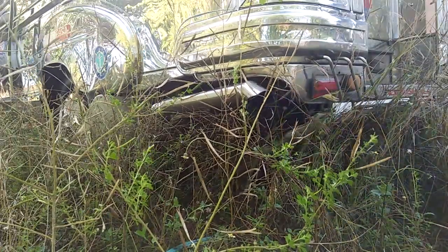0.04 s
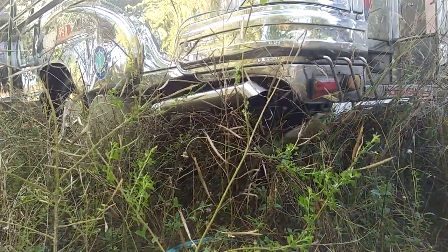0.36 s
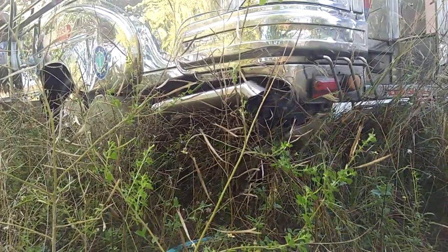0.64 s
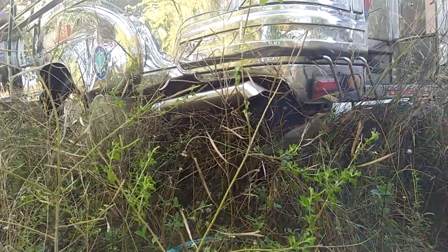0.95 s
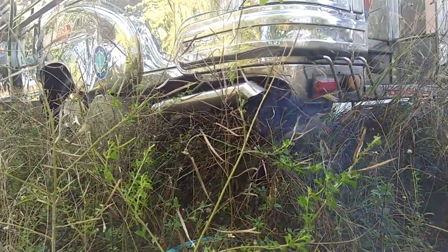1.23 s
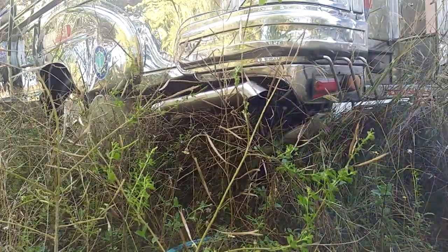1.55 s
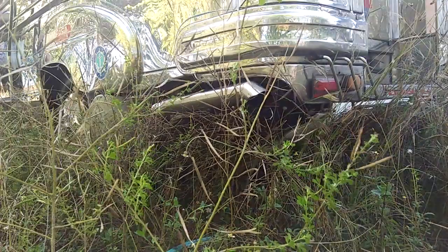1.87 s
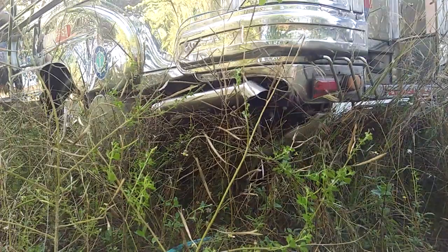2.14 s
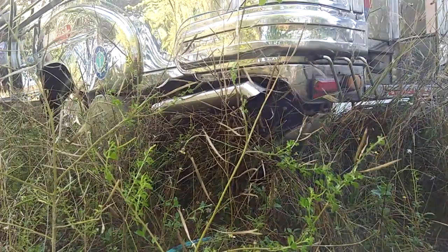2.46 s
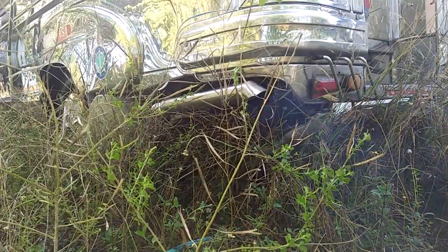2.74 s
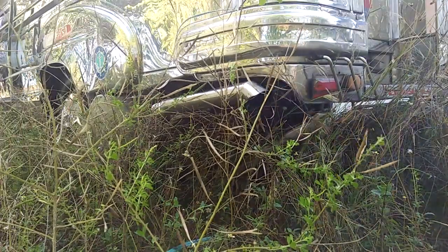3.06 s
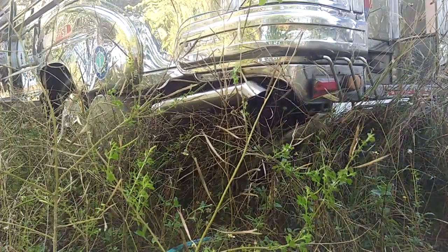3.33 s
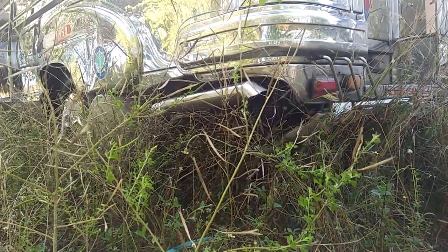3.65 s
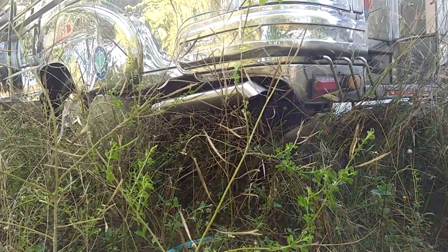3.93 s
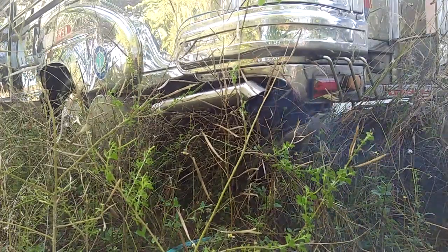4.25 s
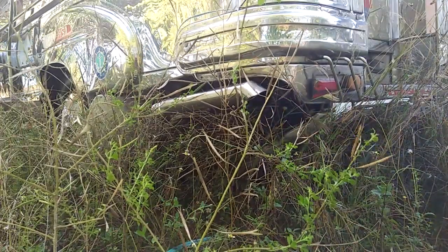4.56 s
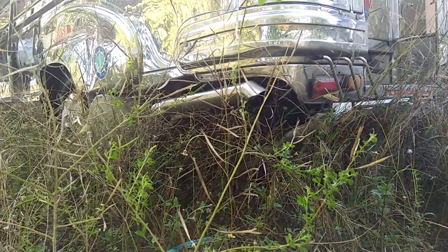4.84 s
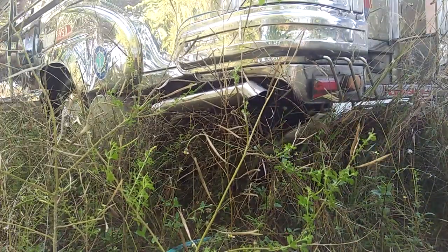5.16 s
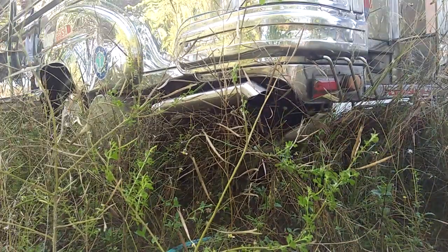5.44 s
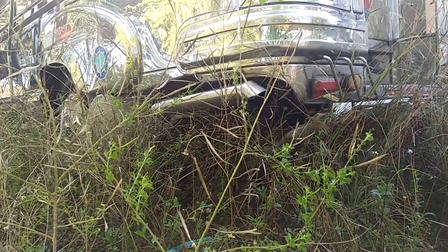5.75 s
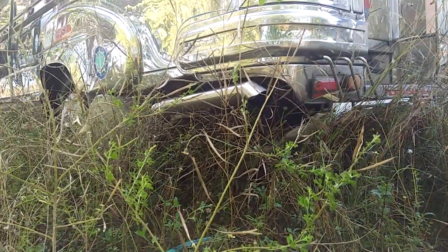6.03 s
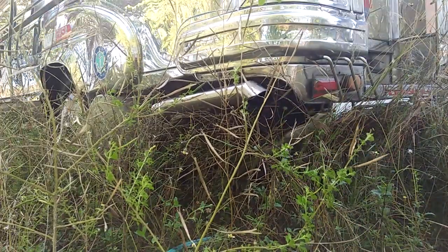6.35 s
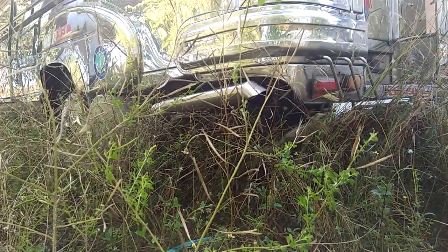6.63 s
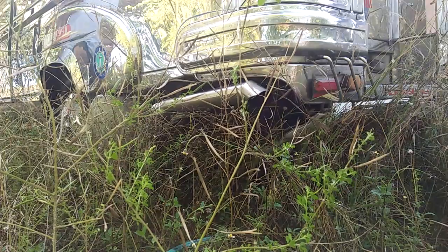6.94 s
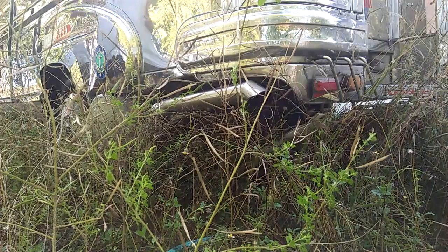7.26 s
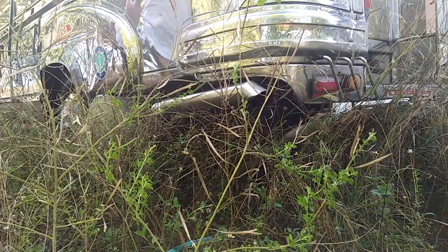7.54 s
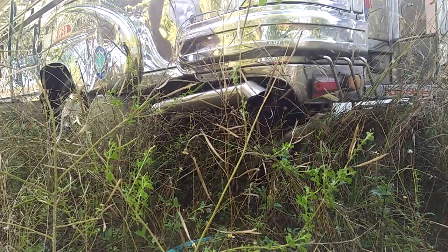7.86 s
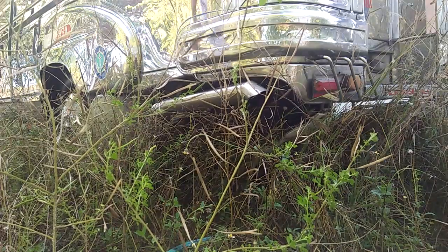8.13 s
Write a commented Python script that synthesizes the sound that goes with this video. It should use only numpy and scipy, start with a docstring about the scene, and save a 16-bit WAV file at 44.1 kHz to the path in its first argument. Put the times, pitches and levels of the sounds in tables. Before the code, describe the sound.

Three sharp engine revs blow water out of a chattering tailpipe before settling into a low, wet idle outdoors.

```python
"""A vehicle parked in tall weeds, heard from near its wet exhaust pipe. The engine is already slowing
when the throttle is blipped three times. Each blip barks firing by firing, tears water loose in a
spitting rasp, then coasts down with a silencer drone, a tinny tailpipe chatter and fine spray. After
the third, water plops in the pipe and the engine sinks to a gurgling idle while the weeds patter and
rustle and footsteps thud softly past, over the dull, low background noise of the yard."""
import sys
import numpy as np
from scipy import signal
from scipy.fft import rfft, irfft, next_fast_len
from scipy.io import wavfile
from scipy.ndimage import uniform_filter1d, minimum_filter1d

SR = 44100
rng = np.random.default_rng(int(sys.argv[2]) if len(sys.argv) > 2 else 0)


def unload_wav(signal):
    """Save mono or channel-first audio to the path in sys.argv[1] as 16-bit WAV at rate SR, clipped to [-1, 1]."""
    wavfile.write(
        sys.argv[1],
        SR,
        np.round(np.clip(np.atleast_2d(signal).T, -1, 1) * 32767).astype(np.int16),
    )


N = 365588
TIME = np.arange(N) / SR


# throttle blips: (open [s], hardest firing [s], shut [s], top firing rate [Hz], drone [dB], boom [dB])
BLIPS = [(.614, .743, 1.055, 73.2, 2.5, 9), (2.16, 2.26, 2.572, 75.3, -.5, 4),
         (3.678, 3.772, 4.08, 75.2, 0, 0)]
OPEN_S, BITE_S, SHUT_S, TOP_HZ, DRONE_DB, BOOM_DB = range(6)
# exhaust pipe resonances: (frequency [Hz], width [Hz], gain [dB])
PIPE_MODES = [(481, 91, 0), (580.6, 48.4, 2.5), (743, 210, 2), (885, 97, 5), (1239, 320, 3),
              (1500, 290, 0.5), (1632, 74, -5), (2175, 380, -7.5), (4334, 530, -19)]
# broadband part of the bark: (frequency [Hz], gain [dB])
BARK_SPECTRUM = [(30, -31), (70, -1.5), (150, 1), (260, -1.5), (380, -6), (1000, -7), (1900, -29),
                 (2700, -21), (3500, -26.5), (8000, -55)]
# firing hiss under load: (frequency [Hz], gain [dB])
HISS_SPECTRUM = [(1200, -19), (2300, 7.5), (3500, -3.5), (4500, 2.5), (6200, 6.5), (7800, 9.5), (9500, 0.5),
                 (14000, -20.5)]

def bark(firings, db=-12, hiss_db=-30, bite_db=-2, octave_db=-3, slap=7.8):
    """Under load each firing sends a pressure slap and a hissing gust through the pipe."""
    bite = 1 + bursts([(blip[BITE_S], bite_db) for blip in BLIPS], decay_s=.034)
    flow = bite * puffs(firings, decay_s=.0045, leak=.13, uneven_db=3, rise_s=.001)
    slaps = slap * firing_hz() / OPEN_HZ * impulses(firings)
    pipe_gain = np.hypot(peaks(PIPE_MODES), spectrum(BARK_SPECTRUM))
    pipe = levelled(colour(flow * noise() + slaps, pipe_gain), samples=2000)
    gusts = levelled(puffs(firings, decay_s=.0072, leak=.011, uneven_db=7.5), samples=2000)
    hiss = amp(hiss_db) * bite * gusts * spread(lambda: shaped_noise(HISS_SPECTRUM))
    push = load()
    return amp(with_speed(octave_db, 0)) * (push ** 1.53 * amp(db) * pipe + push ** .82 * hiss)


# water tearing loose: (start [s], end [s], level [dB])
TEARS = [(0.825, 0.936, -9.5), (2.318, 2.438, -9.5), (3.799, 3.947, -10)]
# spitting water: (frequency [Hz], gain [dB])
RASP_SPECTRUM = [(300, -46), (1200, 1.5), (2200, 2), (3200, -5), (4400, -6), (5200, -7), (6800, -3),
                 (7700, 2.5), (8800, -7), (10500, -11), (14000, -14.5)]

def rasp(firings, db=-3.5, grit_db=1.5):
    """At full flow the gas tears water into a sudden, harsh, pulsing spit."""
    gate = sum(amp(level_db) * np.interp(TIME, [start - .002, start, end, end + .025], [0, 1, 1, 0])
               for start, end, level_db in TEARS)
    flow = puffs(firings, decay_s=.007, leak=.2, uneven_db=2) * amp(grit_db * drift(500))
    spit = amp(db) * gate * levelled(flow, samples=2000)
    return spread(lambda: spit * shaped_noise(RASP_SPECTRUM))


# silencer response: (frequency [Hz], gain [dB])
SILENCER_RESPONSE = [(25, -24), (38, -14.5), (57, -4), (75, 4.5), (90, 3.5), (105, -19.5), (119, -1.5),
                     (130, -4.5), (146, 6), (164, -11.5), (182, -4.5), (197, 1.5), (214, -7.5), (250, -9.5),
                     (285, -15), (340, -15)]
# uneven idle: (time [s], bass level [dB], mid level [dB])
IDLE_LEVELS = [(5.47, -47, -42.5), (5.73, -43, -44.5), (6.32, -45.5, -47), (6.35, -48, -53),
               (6.53, -44.5, -47.5), (6.63, -57.5, -68), (6.85, -48, -55), (6.91, -47, -37.5),
               (6.97, -57, -52.5), (7.63, -45.5, -47.5), (7.7, -48, -53), (7.82, -45.5, -43),
               (7.93, -50, -54), (8.04, -41, -46), (8.18, -50.5, -50.5), (8.29, -43, -45.5)]

def drone(firings, db=-32, octave_db=4, load_db=9.5, mellow_db=-4, idle_db=-5, lope_db=-56):
    """Engine orders slide through the silencer's resonances; uneven cylinders add a half order."""
    rate_hz, push = firing_hz(), load()
    silencer_hz, silencer_db = np.transpose(SILENCER_RESPONSE)
    boom_db = latest_blip(BOOM_DB) * push * np.exp(-(TIME - latest_blip(OPEN_S)) / .14)
    blip_db = uniform_filter1d(latest_blip(DRONE_DB), size=400)
    level_db = db + blip_db + (1 - push) * with_speed(octave_db, 0) + load_db * push
    upper_db = with_speed(0, mellow_db)
    shaky = firings + .012 * drift(22)  # uneven firing roughens the upper orders
    orders = 0
    for k in range(1, 7):
        pass_db = np.interp(k * rate_hz, silencer_hz, silencer_db, right=-40)
        pass_db *= 1 - .48 * push  # flatter under load
        order_db = pass_db + boom_db * 2 / k + upper_db * max(k - 2, 0)
        orders += amp(order_db + drift(8)) * np.sin(2 * np.pi * k * shaky)
    gain = running() * amp(level_db) + amp(idle_db) * idling(IDLE_LEVELS)
    return gain * orders + amp(lope_db) * np.sin(3 * np.pi * firings)


# low rumble: (frequency [Hz], gain [dB])
RUMBLE_SPECTRUM = [(20, -28), (40, -8.5), (80, 4.5), (145, 3.5), (210, -9), (300, -5.5), (380, -24.5),
                   (600, -57.5), (1500, -95.5)]
# soft low thuds of footsteps passing the vehicle: (time [s], level [dB])
FOOTSTEPS = [(6.889, -45), (7.169, -48), (7.969, -56), (8.049, -37)]

def burble_and_footsteps(firings, db=-42, octave_db=14, load_db=6, step_db=-2, slap=2.4):
    """The silencer burbles unevenly; short swells of the same rumble give the thuds of footsteps."""
    slaps = slap * impulses(firings) * rng.exponential(1, N)
    flow = puffs(firings, decay_s=.014, leak=.4, uneven_db=8) * noise() + slaps
    rumble = levelled(colour(flow, spectrum(RUMBLE_SPECTRUM)), samples=9000)
    burble = running() * amp(db + with_speed(octave_db, 0) + load_db * load()) + idling(IDLE_LEVELS)
    steps = amp(step_db) * uniform_filter1d(bursts(FOOTSTEPS, decay_s=.031), size=200)
    return (burble + steps) * rumble


def gurgle(firings, db=-44, octave_db=16, catch_db=2, idle_db=-3, lumpy_db=5):
    """Weak wet puffs ring now one low pipe resonance, now another."""
    flow = puffs(firings, decay_s=.0055, leak=.35, uneven_db=2)
    rings = sum(colour(flow * amp(lumpy_db * drift(23)) * noise(), peaks([mode]))
                for mode in PIPE_MODES[:4])
    gain = running() * amp(db + with_speed(octave_db, catch_db))
    gain += amp(idle_db) * idling(IDLE_LEVELS, column=2)
    return gain * levelled(butterworth(rings, 1500, "low"), samples=7000)


# sharp tailpipe rattles: (time [s], level [dB])
RATTLES = [(0.2124, -23.5), (2.033, -20), (2.0592, -22), (3.5493, -44), (3.5743, -25), (4.99, -32),
           (5.1144, -21), (5.2436, -27), (5.2719, -26), (5.3255, -27.5)]
# bouts of harder chatter: (centre [s], half length [s], boost [dB])
CHATTER_BOUTS = [(0.27, .09, 4.5), (1.48, 0.15, 6), (2.042, 0.067, 10), (2.663, 0.022, 9),
                 (3.553, 0.081, 4), (4.16, 0.034, 2.5), (4.999, 0.083, 10), (5.293, 0.037, 2.5)]

def chatter(firings, db=-42, octave_db=14, catch_db=5, base_hz=1190, rattle_db=-3):
    """The tailpipe buzzes with each firing, louder and higher with more gas, and sometimes rattles."""
    shake = puffs(firings, decay_s=.006, leak=.2, uneven_db=5) * noise()
    pipe = colour(shake, peaks(PIPE_MODES[4:]))
    buzz_hz = base_hz + with_speed(per_octave=310, on_catch=190)
    buzz = levelled(resonate(pipe, buzz_hz, width_hz=480), samples=8000)
    rattles = colour(bursts(RATTLES, decay_s=.0086) * noise(), unit_rms(peaks([(1290, 170, 0)])))
    bouts_db = sum(boost * np.exp(-((TIME - centre) / half) ** 2)
                   for centre, half, boost in CHATTER_BOUTS)
    gain = running() ** 2 * amp(db + bouts_db + with_speed(octave_db, catch_db))
    return gain * buzz + amp(rattle_db) * rattles


# water slugs in the pipe: (time [s], level [dB], start pitch [Hz])
PLOPS = [(4.734, -27, 757), (4.816, -27, 800), (4.896, -22.5, 784), (5.414, -28.5, 662), (5.662, -34, 672),
         (5.794, -30, 600), (5.833, -31.5, 853), (5.925, -29, 573), (5.967, -28.5, 844), (6.25, -34, 848)]

def plops(db=-2, decay_s=.01, rise_s=.00067, glide=1.8, splash=.11):
    """Each slug of water rings as a short, rising bubble note with a splashy edge."""
    t, notes = TIME[:SR // 10], np.zeros(N)
    envelope = (1 - np.exp(-t / rise_s)) * np.exp(-t / decay_s)
    envelope /= envelope.max()
    for start, level_db, hz in PLOPS:
        note = np.sin(2 * np.pi * hz * t * (1 + glide * t))
        notes[round(start * SR):][:len(t)] += amp(level_db + db) * envelope * note
    return notes * (1 + splash * drift(304))


# landing spray: (frequency [Hz], gain [dB])
SPRAY_SPECTRUM = [(1500, -16.5), (2300, 7.5), (3200, -9.5), (4100, -7), (4900, -11), (6500, -4),
                  (7700, 0.5), (9000, -7), (11000, -14), (14000, -14.5)]

def spray(firings, db=-66, octave_db=10, catch_db=12, snap_db=1):
    """Fine drops and mist blown from the pipe pulse with the exhaust; some land with a snap."""
    pulses = levelled(puffs(firings, decay_s=.008, leak=3, uneven_db=7.5), samples=3000)
    snaps = [(when * TIME[-1], snap_db + 10 * (size - .5)) for when, size in rng.random((220, 2))]
    gain = running() * amp(db + with_speed(octave_db, catch_db))
    flow = gain * (pulses + bursts(snaps, decay_s=.0058))
    return spread(lambda: grains(flow, SPRAY_SPECTRUM, per_s=5000, uneven_db=2.1, mist=.24))


# belt squeaks: (start [s], end [s], level [dB])
SQUEAKS = [(0.282, .43, -61.5), (1.092, 1.22, -69), (1.512, 1.718, -63), (3.08, 3.23, -74),
           (4.6, 4.74, -72)]

def squeaks(hz=10420, waver_hz=25):
    """The belt squeals thinly, on and off, as the engine slows."""
    gate = sum(amp(level_db) * np.interp(TIME, [start, (start + end) / 2, end], [0, 1, 0])
               for start, end, level_db in SQUEAKS)
    return gate * np.sin(2 * np.pi * np.cumsum(hz + waver_hz * drift(60)) / SR)


# rustle in the weeds: (time [s], level [dB])
RUSTLE_LEVELS = [(5.47, -73.5), (5.95, -75), (5.97, -67), (6.21, -73.5), (6.26, -69), (6.67, -69),
                 (6.74, -64), (7.09, -68.5), (7.24, -60), (7.69, -64), (8.1, -60.5), (8.19, -66),
                 (8.25, -56.5)]
# snaps in the weeds: (time [s], level [dB])
WEED_SNAPS = [(6.898, -49), (7.8376, -46), (7.9997, -42.5), (8.0546, -57), (8.1085, -51), (8.2232, -53)]
# patter in the weeds: (frequency [Hz], gain [dB])
PATTER_SPECTRUM = [(1000, -20), (1500, -25), (2420, -1), (3200, -18), (4040, -16), (4700, -20),
                   (6300, -8.5), (7630, -3), (10000, -10.5), (14000, -20.5)]

def weeds(db=2.5, clump_db=3, snap_db=-8):
    """A crisp, clumpy patter and rustle with a few sharp snaps, heard once the engine idles."""
    rustle = amp(db + clump_db * drift(24)) * idling(RUSTLE_LEVELS)
    snaps = amp(snap_db) * bursts(WEED_SNAPS, decay_s=.012)
    return spread(lambda: grains(rustle + snaps, PATTER_SPECTRUM, per_s=4000, uneven_db=2.8, mist=.81))


# bodywork knocks: (time [s], level [dB])
KNOCKS = [(6.106, -41), (6.251, -44), (6.893, -34.5), (8.02, -41)]

def knocks(db=-5, decay_s=.017):
    """Short, dull blows ring a body panel."""
    panel = peaks([(520, 320, -47), (860, 380, 3), (1550, 340, 12), (2570, 1600, -9)])
    return amp(db) * colour(bursts(KNOCKS, decay_s) * noise(), unit_rms(panel))


def echo(x, db=-16.5, t60_s=.94, delay_s=.031, cutoff_hz=8300):
    """Fence, walls and weeds scatter the sound back in a thin, duller tail."""
    t = TIME[:SR]
    dull = signal.lfilter(*signal.butter(2, cutoff_hz, fs=SR), x)

    def tail():
        reflections = rng.standard_normal(SR) * (rng.random(SR) < .1)
        taps = reflections * (t > delay_s) * 1000 ** (-t / t60_s)
        return signal.fftconvolve(dull, taps / np.linalg.norm(taps))[:N]
    return amp(db) * spread(tail)


# outdoor background noise: (frequency [Hz], gain [dB])
YARD_SPECTRUM = [(18, -48), (30, -9), (60, 6.5), (91, 4), (143, -16), (234, -27.5), (303, -7), (375, -17.5),
                 (465, -12.5), (713, -4.5), (883, -22.5), (1000, -12), (1910, -15), (5000, -37.5),
                 (6500, -77.5), (11000, -120)]

def yard(db=-53, swell_db=-.8, lumpy_db=5.5, split_hz=1300):
    """Dull, low outdoor background noise of the yard: lumpy low down, smoother above."""
    low = butterworth(shaped_noise(YARD_SPECTRUM) * amp(lumpy_db * drift(25)), split_hz, "low")
    high = butterworth(shaped_noise(YARD_SPECTRUM) * amp(1.5 * drift(15)), split_hz, "high")
    return amp(db + swell_db * drift(3)) * (low + high)


OPEN_HZ, CATCH_HZ, HOLD_HZ, IDLE_HZ = 44.5, 45, 37.5, 25  # firing rates
SETTLE_S = 1.25  # after the throttle shuts

def firing_hz(drag_s=1.62, sink_s=.6):
    """Climbs from the hardest firing, falls under drag until the governor holds, then sinks to idle."""
    age, top_hz = since_shut(), latest_blip(TOP_HZ, before=BLIPS[0][TOP_HZ])
    climb = np.clip(1 + age / (latest_blip(SHUT_S, before=1) - latest_blip(BITE_S)), 0, 1)
    rising = OPEN_HZ + (top_hz - OPEN_HZ) * climb
    governed = IDLE_HZ + (HOLD_HZ - IDLE_HZ) * np.exp(-np.maximum(age - SETTLE_S, 0) / sink_s)
    falling = np.logaddexp(top_hz * np.exp(-age / drag_s), governed)
    return uniform_filter1d(np.where(age < 0, rising, falling), size=400)


def crank():
    """Running count of firings, a whole number at each blip's hardest firing."""
    firings = np.cumsum(firing_hz()) / SR
    bites_s = [blip[BITE_S] for blip in BLIPS]
    offsets = np.unwrap(np.interp(bites_s, TIME, firings) % 1, period=1)
    return firings - np.interp(TIME, bites_s, offsets) + 2


def latest_blip(column, before=0):
    """One column of BLIPS, held until the throttle opens again."""
    rows = np.array(BLIPS)
    return np.r_[before, rows[:, column]][np.searchsorted(rows[:, OPEN_S], TIME)]


def since_shut():
    """Seconds since the throttle shut; negative while open. Starts partway through a run-down."""
    return TIME - latest_blip(SHUT_S, before=-.92)


def load(attack_s=.038, release_s=.03):
    """Engine load, 0-1: builds as the throttle opens, gone soon after it shuts."""
    build = (1 - np.exp(-(TIME - latest_blip(OPEN_S)) / attack_s)) ** 2
    return build * np.clip(1 - since_shut() / release_s, 0, 1)


def running(fade_db_per_s=96):
    """Gain of 1 through each blip and run-down, fading as the engine settles."""
    return uniform_filter1d(amp(-fade_db_per_s * np.maximum(since_shut() - SETTLE_S, 0)), size=400)


def idling(rows, column=1):
    """Gain from a table's dB column, taking over as the engine settles."""
    rows = np.array(rows)
    return (1 - running()) * amp(np.interp(TIME, rows[:, 0], rows[:, column]))


def with_speed(per_octave, on_catch):
    """Offset per octave of speed, plus one as the governor feeds fuel to catch the fall."""
    rate_hz = firing_hz()
    caught = np.interp(rate_hz, [HOLD_HZ, CATCH_HZ], [1, 0])
    return per_octave * np.log2(rate_hz / CATCH_HZ) + on_catch * caught


def puffs(firings, decay_s, leak, uneven_db, rise_s=.00061):
    """Gas flow: a jump of uneven strength at each firing, over a steady leak."""
    age = (firings % 1) / (np.gradient(firings) * SR)
    strength = amp(uneven_db * rng.uniform(-1.3, 1, N))[firings.astype(int)]
    return strength * (1 - np.exp(-age / rise_s)) * np.exp(-age / decay_s) + leak


def impulses(firings):
    """Unit impulse at each firing."""
    return np.diff(np.floor(firings), prepend=np.floor(firings[0]))


def bursts(rows, decay_s):
    """Envelope that jumps at each (time [s], level [dB]) and dies away."""
    kicks = np.zeros(N)
    for start, db in rows:
        kicks[round(start * SR)] += amp(db)
    return signal.lfilter([1], [1, -np.exp(-1 / (decay_s * SR))], kicks)


def grains(envelope, points, per_s, uneven_db, mist):
    """Random ticks of uneven size over a mist of noise."""
    sizes = amp(uneven_db * np.minimum(rng.exponential(1, N), 5))
    hits = rng.random(N) < per_s / SR
    ticks = unit_rms((sizes * hits + mist) * noise())
    return colour(ticks * envelope, unit_rms(spectrum(points)))


def noise():
    return rng.standard_normal(N)


def shaped_noise(points):
    return unit_rms(colour(noise(), spectrum(points)))


def drift(rate_hz):
    """Random wander of rms 1, up to about rate_hz."""
    size = next_fast_len(N // 16 + 2)
    rolloff = 1 + (np.fft.rfftfreq(size, 16 / SR) / rate_hz) ** 4
    slow = irfft(rfft(rng.standard_normal(size)) / rolloff, size)
    return np.interp(np.arange(N) / 16, np.arange(size), unit_rms(slow))


def amp(db):
    return 10 ** (np.asarray(db) / 20)


def unit_rms(x):
    return x / np.sqrt(np.mean(x ** 2) + 1e-20)


def levelled(x, samples):
    """Holds the slow level at 1; single pulses stand."""
    return x / np.sqrt(abs(uniform_filter1d(x ** 2, samples)) + 1e-12)


GRID_HZ = np.fft.rfftfreq(4096, 1 / SR)

def spectrum(points):
    """Gain curve through (frequency [Hz], gain [dB]) points."""
    hz, db = np.transpose(points)
    return amp(np.interp(np.log(GRID_HZ + 1), np.log(hz), db))


def peaks(modes):
    """Gain curve of steep (frequency [Hz], width [Hz], gain [dB]) resonances."""
    gains = [amp(db) / (1 + (2 * (GRID_HZ - hz) / width) ** 2) for hz, width, db in modes]
    return np.linalg.norm(gains, axis=0)


def colour(x, gain):
    """Minimum-phase filter: rings after a pulse, never before."""
    log_gain = np.log(np.maximum(np.r_[gain, gain[-2:0:-1]], 1e-5))
    taps = np.fft.ifft(np.exp(np.conj(signal.hilbert(log_gain)))).real
    taper = np.cos(np.linspace(0, np.pi / 2, len(taps)))
    return signal.oaconvolve(x, taps * taper)[:len(x)]


def resonate(x, hz, width_hz):
    """Steep resonance following the curve hz."""
    carrier = np.exp(2j * np.pi * np.cumsum(hz) / SR)
    pole = np.exp(-np.pi * width_hz / SR)
    return (carrier * signal.lfilter([(1 - pole) ** 3], np.poly([pole] * 3), x / carrier)).real


def butterworth(x, hz, kind):
    return signal.sosfilt(signal.butter(4, hz, kind, fs=SR, output="sos"), x)


# stereo side relative to mid: (frequency [Hz], gain [dB])
SIDE_SPECTRUM = [(2700, -80), (3700, -24), (5000, -6), (8000, -4.3), (14000, -6)]

def spread(make):
    """Stereo from two draws of a sound; only the treble is wide."""
    side = colour(make(), spectrum(SIDE_SPECTRUM))
    return make() + np.array([side, -side])


def scene():
    """One crankshaft times all the exhaust pulses; weeds, knocks and yard noise lie behind."""
    firings = crank()
    blips = bark(firings) + rasp(firings)
    coasting = gurgle(firings) + chatter(firings) + plops() + spray(firings) + squeaks()
    background = weeds() + knocks() + yard()
    echoes = echo(blips.mean(0))
    return blips + echoes + drone(firings) + burble_and_footsteps(firings) + coasting + background


def record(dry, ceiling_db=-2, cutoff_hz=14350):
    """A fast limiter holds down the loudest firings; a steep low-pass follows."""
    gain = np.minimum(1, amp(ceiling_db) / (abs(dry).max(0) + 1e-9))
    limited = dry * uniform_filter1d(minimum_filter1d(gain, size=60), size=60)
    lowpass = signal.firwin(301, cutoff_hz, window=("kaiser", 8), fs=SR)
    return signal.oaconvolve(limited, lowpass[None], "same")


dry = scene()
out = record(dry)
unload_wav(out)
```